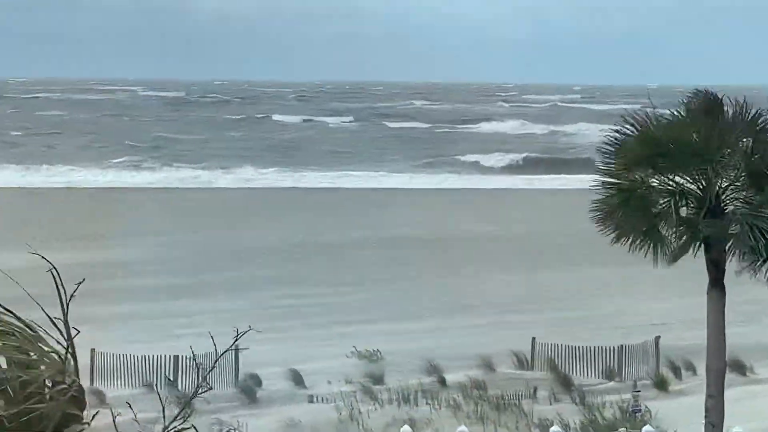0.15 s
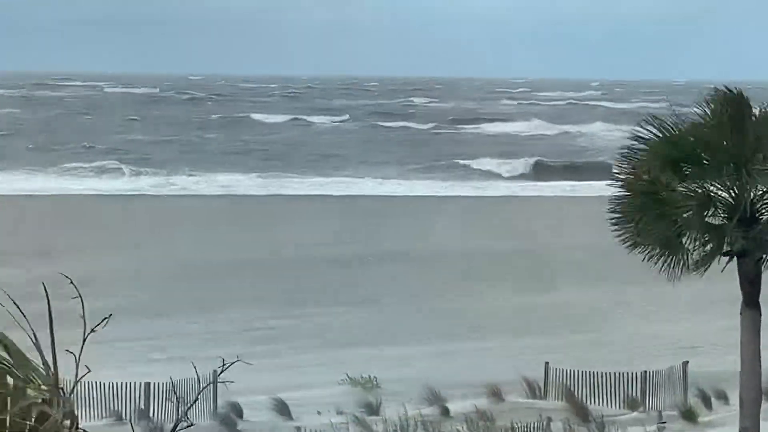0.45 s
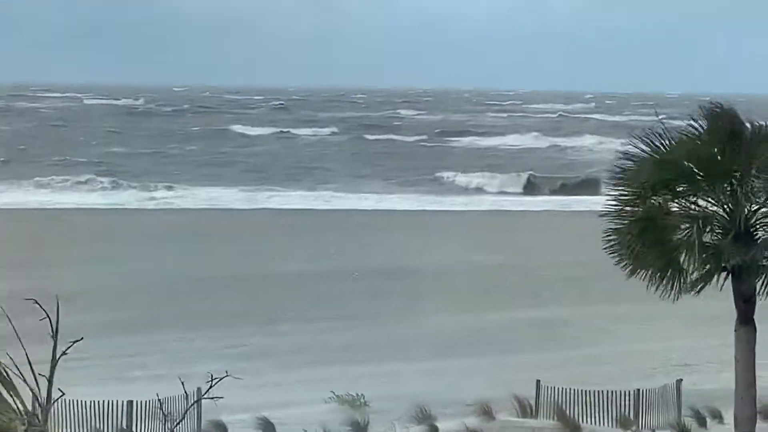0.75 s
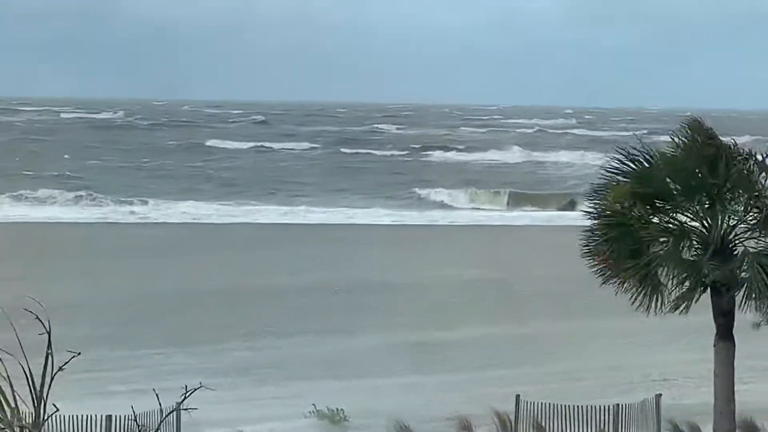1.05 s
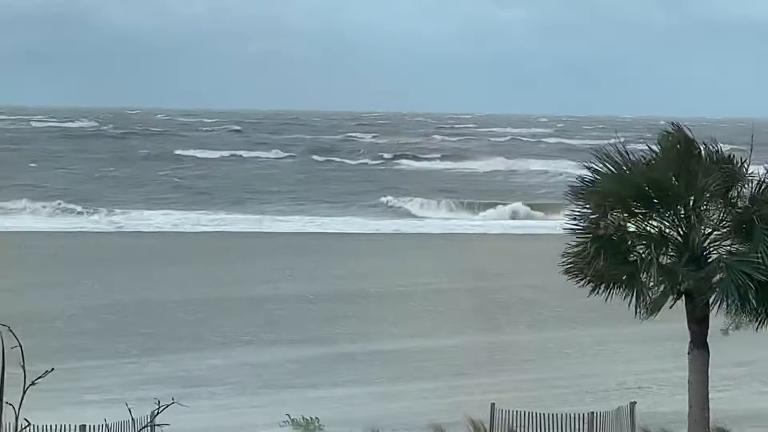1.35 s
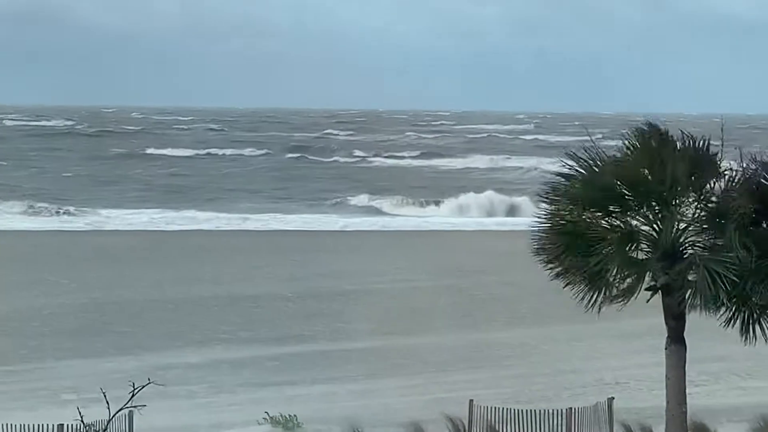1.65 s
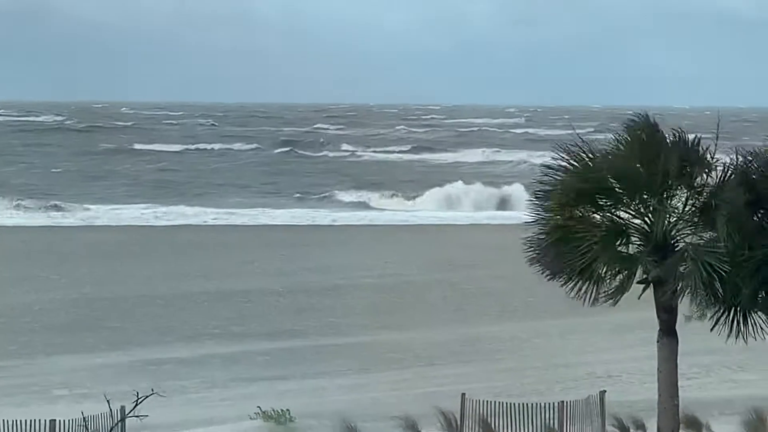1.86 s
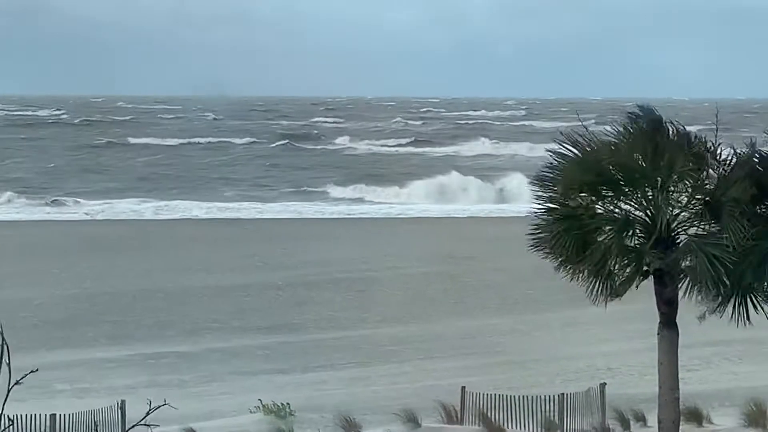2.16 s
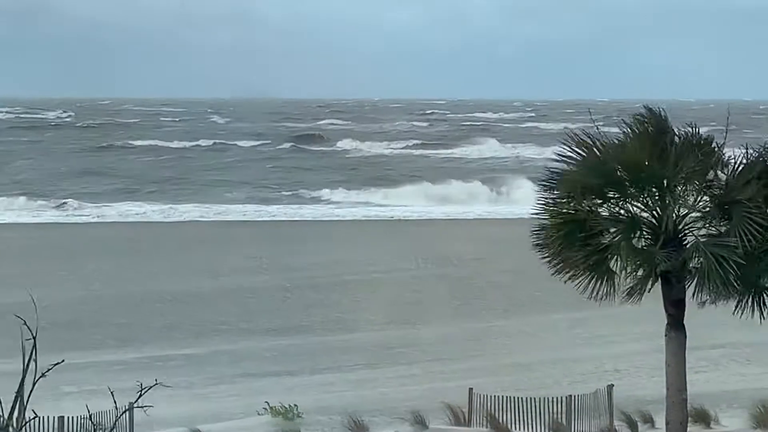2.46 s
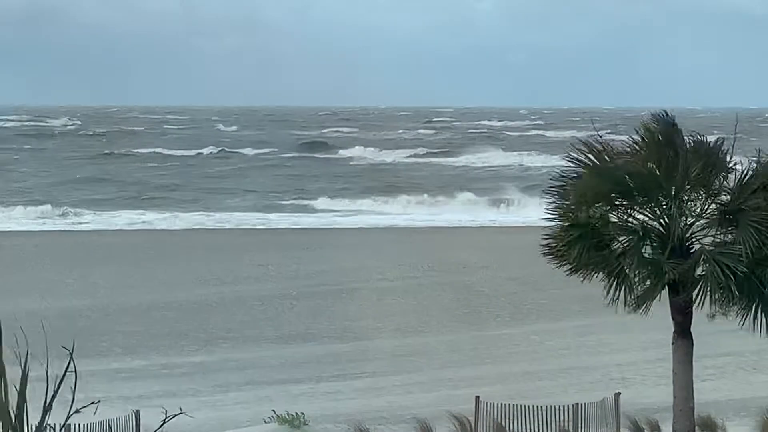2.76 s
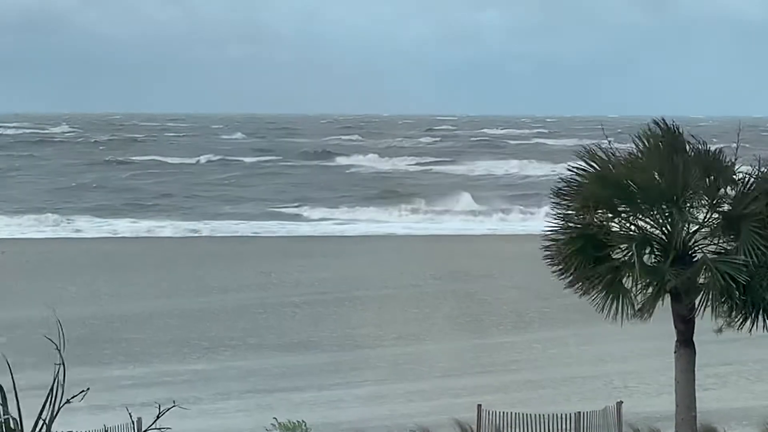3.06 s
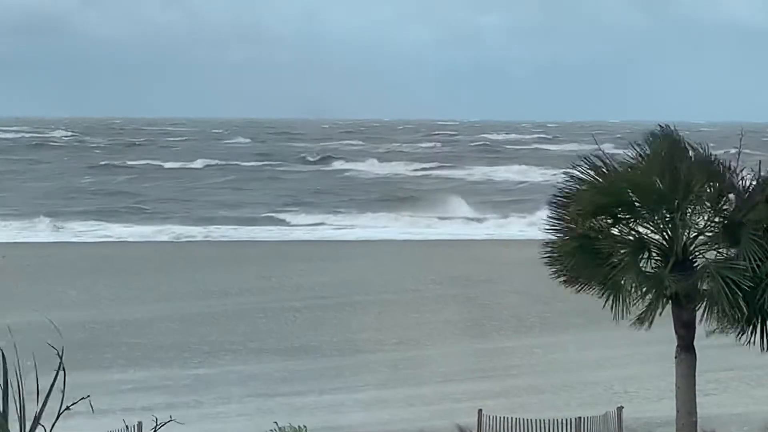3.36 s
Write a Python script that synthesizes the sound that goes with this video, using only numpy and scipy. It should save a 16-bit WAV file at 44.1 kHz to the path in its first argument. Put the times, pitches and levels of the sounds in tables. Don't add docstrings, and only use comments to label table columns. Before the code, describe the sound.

Low surf roar fills a stormy beach, heard from a sheltered porch with a stereo microphone; hollow booms and water slaps come and go, then wind through palm fronds swells with hissing spray near the end.

```python
import sys
import numpy as np
from scipy import signal
from scipy.fft import rfft, irfft, next_fast_len
from scipy.io import wavfile
from scipy.ndimage import uniform_filter1d

SR = 44100
rng = np.random.default_rng(int(sys.argv[2]) if len(sys.argv) > 2 else 0)


def log_audio(samples):
    frames = np.atleast_2d(samples).T
    limited = np.clip(frames, -1, 1)
    pcm = np.round(limited * 32767).astype(np.int16)
    wavfile.write(sys.argv[1], SR, pcm)


def rack_gain(trim_db):
    fader = np.asarray(trim_db, float)
    return 10 ** (fader / 20)


N = 154350
SIZE = next_fast_len(N + 4096)

# f/Hz, likeness [0-1], right leads/rad, left louder/dB
SURF_PORTS = [(25, .99, -.05, 0), (100, .985, -.34, 0), (280, .99, -.73, 0), (550, .9, -.88, 3),
              (800, .45, -1.6, 5)]
RUSH_PORTS = [(283, 1, -.8, -3), (520, .9, -.9, 2.5), (900, .2, -2.5, 4.5), (1200, .4, -4.2, 6.5),
              (1600, .6, -5.1, 3.5), (2100, .2, -5.3, 4.5), (3000, .55, -3.3, 2), (4300, .45, -7, .5)]
HISS_PORTS = [(5000, .2, 0, 0), (6500, .6, 0, 0), (7500, .8, 0, 0), (8400, .995, 0, 0), (9700, .85, 0, 0),
              (11000, .97, 0, 0), (12200, .85, 0, 0), (13300, .995, 0, 0)]
EDGE_PORTS = [(3000, .5, 3.1, 1), (3360, .4, 2.2, 0), (3530, .8, 1.1, 0), (3700, .8, .7, 0),
              (4100, .6, -.5, 1), (4600, .4, -.9, 1)]


def in_time(rows):
    time_s, *columns = np.transpose(rows)
    return [np.interp(np.arange(N) / SR, time_s, c) for c in columns]


def in_hz(rows, hz):
    f_hz, *columns = np.transpose(rows)
    return [np.interp(np.log(hz), np.log(f_hz), c) for c in columns]


def rms_one(x):
    return x / np.sqrt(np.mean(x ** 2) + 1e-20)


def drift(rate_hz):
    step, settle = 40, 2000
    r = np.exp(-2 * np.pi * rate_hz * step / SR)
    white = rng.standard_normal(N // step + settle + 2)
    slow = signal.lfilter([1], [1, -2 * r, r * r], white)[settle:]
    slow = rms_one(slow - slow.mean())
    return np.interp(np.arange(N) / step, np.arange(len(slow)), slow)


def swells(rows):
    t = np.arange(N) / SR
    return sum(rack_gain(db) * np.exp(-((t - start_s) / length_s * 2) ** 2) for start_s, db, length_s in rows)


def evened(x, share, size):
    swing = uniform_filter1d(np.mean(x ** 2, axis=0), size=size) + 0.14
    return rms_one(x / swing ** (share / 2))


def lift_db(rows, hz):
    return sum(db / (1 + (2 * (hz - f_hz) / width_hz) ** 2) for f_hz, width_hz, db in rows)


def at_ports(ports, turn=0):
    # f/Hz, width/Hz, lift/dB
    porch_modes = [(86.5, 68, 1), (144.7, 8.7, 5), (173.3, 11, 5.5), (275.5, 24, 4.5), (371.7, 21, 5.5),
                   (738, 110, 3.5), (1605, 86, 1.5)]
    # f/Hz, width/Hz, lift/dB
    right_rings = [(787, 22, 1.5), (1000, 27, 11), (1370, 30, -3)]
    in_step_hz, full_turn_hz = 6250, 4750
    hz = np.maximum(np.arange(SIZE // 2 + 1) * SR / SIZE, 1)
    alike, lead_rad, left_db = in_hz(ports, hz)
    alike = np.clip(alike, 0, 1)
    one, other = rfft(rng.standard_normal((2, SIZE)))
    lead_rad = lead_rad + turn * 2 * np.pi * (hz - in_step_hz) / full_turn_hz
    right = alike * np.exp(1j * lead_rad) * one + np.sqrt(1 - alike ** 2) * other
    right = right * rack_gain(lift_db(right_rings, hz))
    pair = np.array([one * rack_gain(left_db / 2), right * rack_gain(-left_db / 2)])
    return hz, pair * rack_gain(lift_db(porch_modes, hz))


def airy(colour, ports, shared_db, own_db, rate_hz, turn=0, even=0):
    hz, pair = at_ports(ports, turn)
    pair = pair * rack_gain(in_hz(colour, hz)[0])
    half_octave = 2 * np.log2(hz)
    first, last = int(2 * np.log2(colour[0][0])), int(2 * np.log2(colour[-1][0])) + 1
    together = drift(rate_hz / 2)
    out = 0
    for k in range(first, last + 1):
        window = np.cos(np.pi / 2 * np.clip(half_octave - k, -1, 1)) ** 2
        band = irfft(pair * window, SIZE)[:, :N]
        if even:
            band = np.std(band) * evened(rms_one(band), even, size=SR // 12)
        out = out + band * rack_gain(shared_db * together + own_db * drift(rate_hz))
    return rms_one(out)


def resonant(ports, centre_hz, width_hz):
    hz, pair = at_ports(ports)
    detune = (hz ** 2 - centre_hz ** 2) / (hz * width_hz)
    return rms_one(irfft(pair / (1 + detune ** 2), SIZE)[:, :N])


def microphone_hiss():
    # f/Hz, density/dB per Hz
    hiss_colour = [(2000, -8), (4500, -2), (6500, -2), (8500, 0), (10500, 0), (12500, -2), (14000, -5),
                   (15200, -12.5)]
    return rack_gain(-84) * airy(hiss_colour, HISS_PORTS, shared_db=.5, own_db=1.0, rate_hz=14.0, turn=1)


def bird():
    # t/s, pitch/Hz, level/dB
    peep_track = [
        (1.832, 5680, -106),
        (1.843, 5750, -95),
        (1.863, 5890, -91.5),
        (1.882, 5895, -90),
        (1.9, 5830, -88),
        (1.922, 5740, -92),
        (1.935, 5680, -112),
    ]
    hz, db = in_time(peep_track)
    t = np.arange(N) / SR
    sounding = (t > peep_track[0][0]) & (t < peep_track[-1][0])
    return np.sqrt(2) * rack_gain(db) * sounding * np.sin(2 * np.pi * np.cumsum(hz) / SR)


def leaves():
    # t/s, level/dB, length/s
    rustle_events = [(.26, -91, .04), (.7, -92, .04), (1.595, -87, .02), (1.82, -89, .02), (1.99, -87, .04),
                     (2.3, -92, .05), (2.448, -79.5, .03), (2.485, -82.5, .06), (2.82, -88, .06),
                     (3.32, -88, .08), (3.455, -79.5, .06)]
    # f/Hz, density/dB per Hz
    rustle_colour = [(3000, -10), (4500, -2), (5500, -4), (7100, 2), (9000, -5), (12000, -4), (14000, -7),
                     (16000, -14)]
    noise = airy(rustle_colour, HISS_PORTS, shared_db=.3, own_db=.8, rate_hz=40.0, turn=1)
    return swells(rustle_events) * noise


def sand():
    # t/s, level/dB
    sand_level = [(0, -92.5), (1.4, -91), (2.0, -93), (2.6, -92), (2.82, -83), (2.95, -85.5), (3.15, -83),
                  (3.3, -85), (3.45, -77.5), (3.5, -75)]
    return rack_gain(in_time(sand_level)[0]) * resonant(EDGE_PORTS, centre_hz=3980, width_hz=730)


def spray():
    # t/s, level/dB, length/s
    spray_bursts = [
        (1.56, -76, .06),
        (2.27, -73, .14),
        (2.82, -74, .1),
        (3.08, -79, .12),
        (3.33, -71, .1),
        (3.43, -67, .14),
    ]
    roughness = rack_gain(2.5 * drift(60))
    return swells(spray_bursts) * roughness * resonant(RUSH_PORTS, centre_hz=1640, width_hz=1360)


def slaps():
    # t/s, level/dB, length/s
    slap_events = [(.25, -52.5, 0.25), (.75, -46.5, 0.11), (1.72, -50.5, 0.053), (2.05, -47.5, 0.077),
                   (2.45, -48.5, 0.19), (2.85, -49, 0.31), (3.15, -45, 0.19), (3.3, -42, 0.13)]
    noise = resonant(SURF_PORTS, centre_hz=167, width_hz=97)
    return swells(slap_events) * evened(noise, .56, size=SR // 40)


def gusts():
    # t/s, level/dB
    gust_level = [(0, -74.5), (.6, -75.5), (1.35, -75), (1.53, -71), (1.65, -73.5), (1.9, -74), (2.1, -71),
                  (2.28, -67.5), (2.4, -72.5), (2.6, -69.5), (2.72, -71.5), (2.82, -68), (2.95, -71),
                  (3.1, -72), (3.25, -69), (3.42, -63), (3.5, -63.5)]
    # f/Hz, density/dB per Hz
    rush_colour = [(250, 6.5), (500, 7), (900, -8), (1500, -14.5), (2300, -17), (3300, -18.5),
                   (4200, -36.5), (5500, -47)]
    # t/s, level/dB, pitch/Hz
    whistle_track = [(0, -91, 3500), (1.2, -90, 3500), (2.05, -85.5, 3550), (2.68, -85.5, 3480),
                     (2.8, -74, 3370), (2.9, -82, 3480), (3.04, -79.5, 3450), (3.12, -83, 3500),
                     (3.2, -82, 3550), (3.34, -74.5, 3630), (3.42, -79, 3500), (3.5, -75, 3620)]
    even = .5
    rush = airy(rush_colour, RUSH_PORTS, shared_db=0.5, own_db=1.0, rate_hz=8.8, even=even)
    rush = rack_gain(in_time(gust_level)[0] + 17.5) * rush
    db, pitch_hz = in_time(whistle_track)
    centre_hz, waver_hz = 3500, 20
    shift_hz = pitch_hz - centre_hz + waver_hz * drift(6.8)
    shift = np.exp(2j * np.pi * np.cumsum(shift_hz) / SR)
    breath = evened(resonant(EDGE_PORTS, centre_hz, width_hz=220), even, size=SR // 20)
    whistle = np.real(signal.hilbert(breath) * shift)
    return rush + rack_gain(db - 1 + .8 * drift(15)) * whistle


def surf():
    # t/s, level/dB
    roar_level = [(0.0, -41.5), (0.16, -47.5), (0.48, -46.5), (0.53, -48), (1.02, -43.5), (1.04, -43.5),
                  (1.35, -46), (1.58, -42.5), (1.8, -44), (2.0, -45.5), (2.05, -42), (2.32, -43),
                  (2.44, -44.5), (2.6, -43.5), (3.13, -43), (3.19, -49), (3.23, -44), (3.5, -40.5)]
    # f/Hz, density/dB per Hz
    roar_colour = [(20, -32.5), (36, -14), (50, 2), (95, -1.5), (170, -5), (280, -8.5), (500, -23),
                   (1000, -48.5)]
    # t/s, level/dB
    boom_level = [(0.0, -44.5), (0.34, -62), (0.71, -42.5), (1.03, -59), (1.12, -43.5), (1.27, -50),
                  (1.65, -44), (1.92, -62), (2.0, -42.5), (2.22, -48.5), (2.25, -50), (2.32, -47.5),
                  (2.58, -35), (2.65, -50), (2.92, -37), (2.96, -44.5), (3.46, -44), (3.5, -61)]
    # t/s, level/dB, length/s
    thud_events = [
        (1.35, -47, 0.22),
        (2.33, -49, 0.12),
        (2.8, -51.5, 0.31),
        (2.43, -41.5, 0.15),
        (2.58, -45, .1),
        (3.19, -39, 0.14),
    ]
    even = .56
    roar = airy(roar_colour, SURF_PORTS, shared_db=0.73, own_db=0.84, rate_hz=8.1, even=.55)
    boom = evened(resonant(SURF_PORTS, centre_hz=56.8, width_hz=16), even, size=SR // 25)
    thud = evened(resonant(SURF_PORTS, centre_hz=111, width_hz=77), even, size=SR // 40)
    roar = rack_gain(in_time(roar_level)[0]) * roar
    boom = rack_gain(in_time(boom_level)[0] - 2.5) * boom
    return roar + boom + swells(thud_events) * thud


def scene():
    return bird() + leaves() + sand() + spray() + slaps() + gusts() + surf()


def low_pass(x):
    return signal.sosfilt(signal.butter(12, 15140, fs=SR, output="sos"), x)


def record(dry):
    t = np.arange(N) / SR
    ends = np.sin(np.pi / 2 * np.clip(np.minimum(t, t[::-1]) / .004, 0, 1)) ** 2
    return low_pass((dry + microphone_hiss()) * ends)


dry = scene()
out = record(dry)
log_audio(out)
```